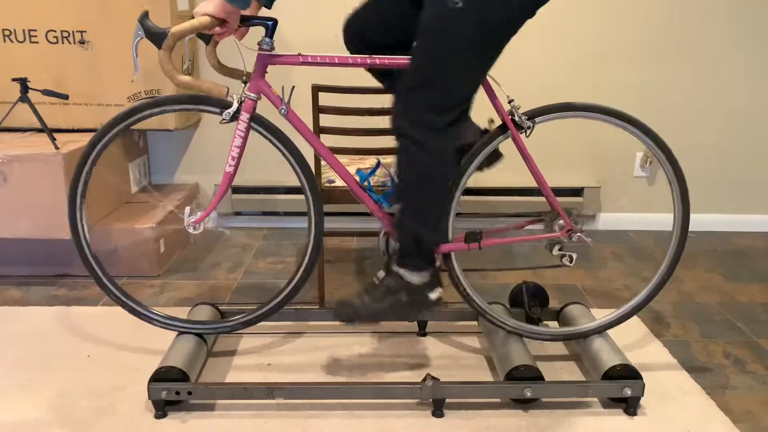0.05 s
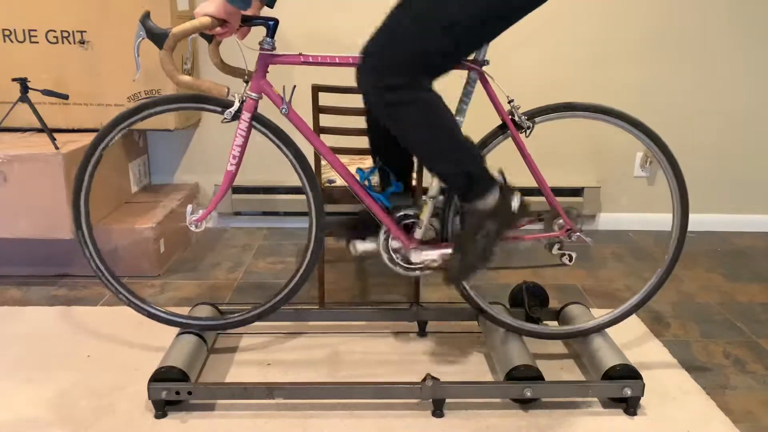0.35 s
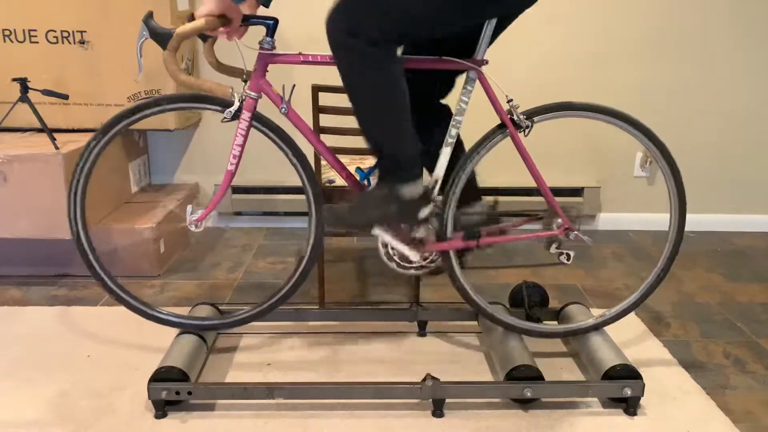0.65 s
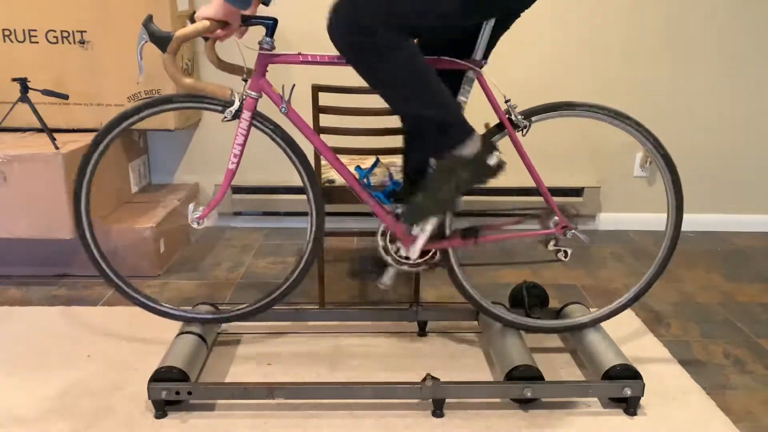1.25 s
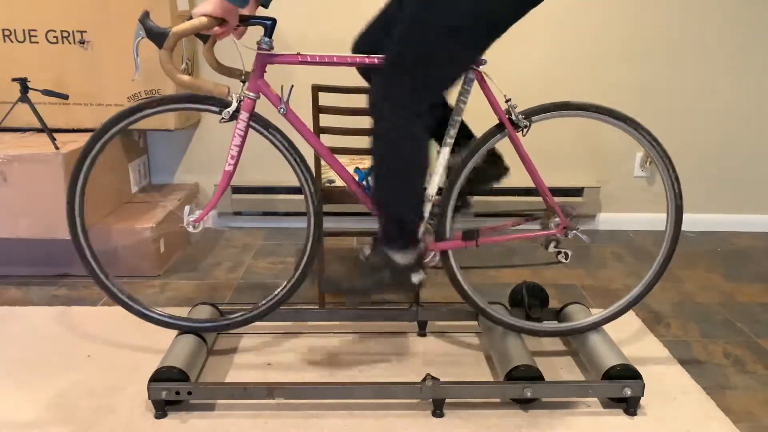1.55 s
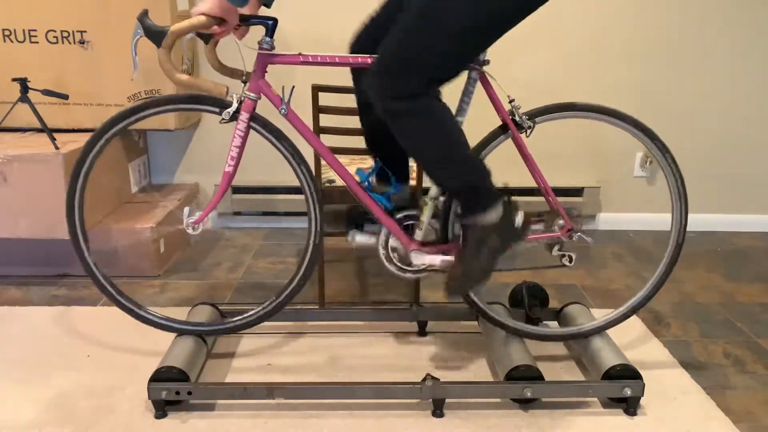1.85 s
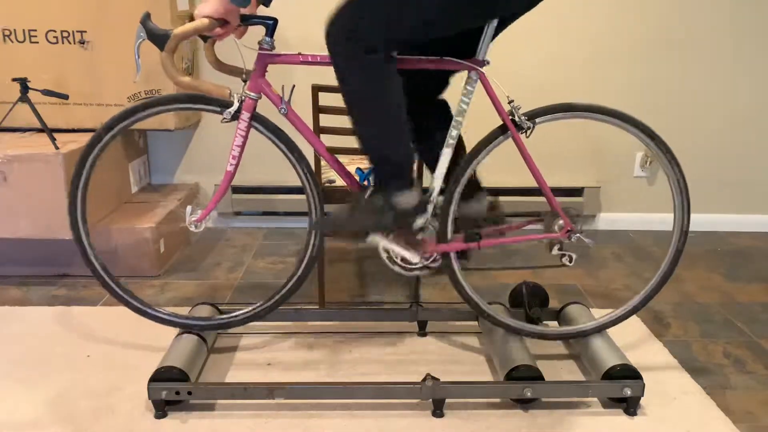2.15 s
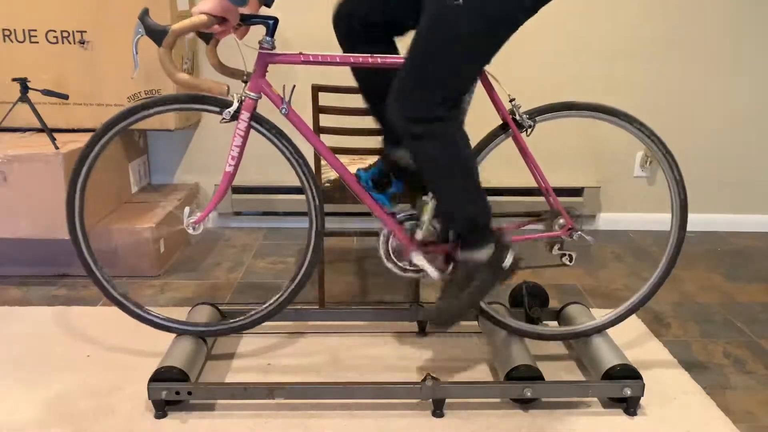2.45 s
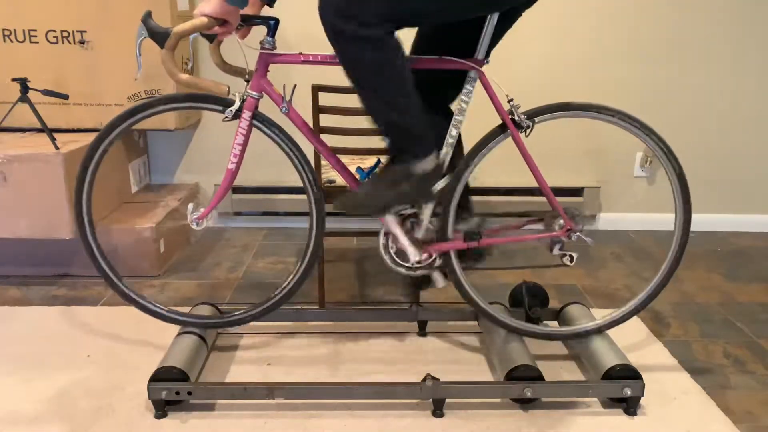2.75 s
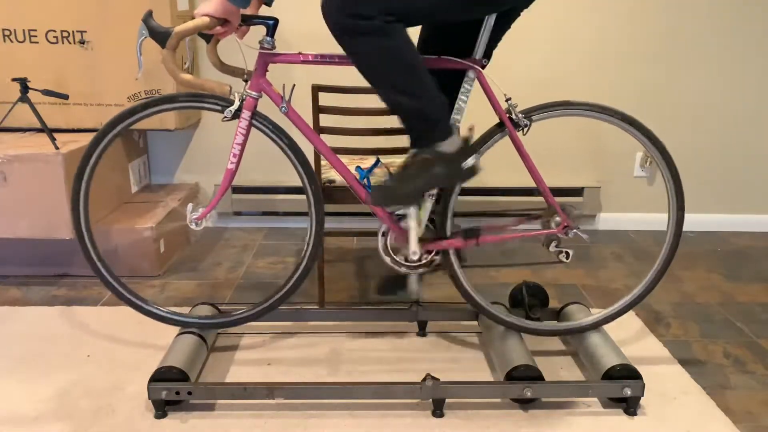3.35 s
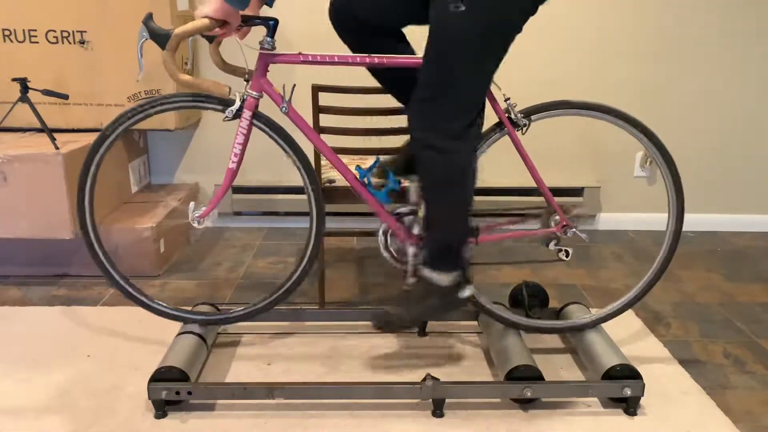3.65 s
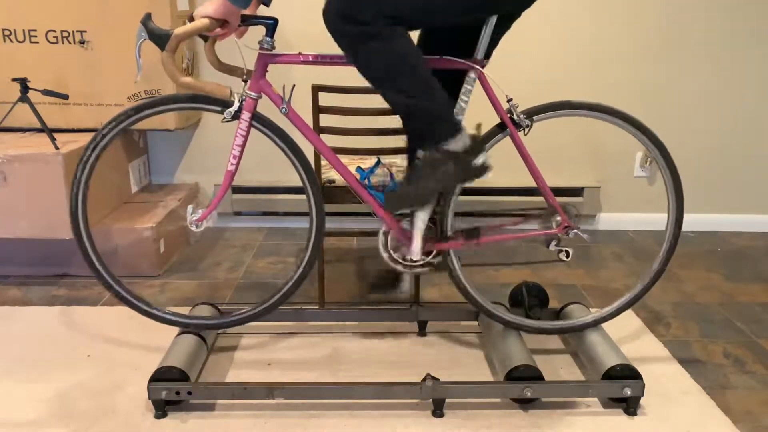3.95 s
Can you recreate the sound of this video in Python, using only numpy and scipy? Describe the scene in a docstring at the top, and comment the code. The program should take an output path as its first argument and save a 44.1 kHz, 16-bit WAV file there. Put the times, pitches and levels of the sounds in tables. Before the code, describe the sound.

Bicycle tyres rumble and whirr steadily on indoor rollers, with a lightly ticking chain.

```python
"""A room where a bicycle is pedalled on indoor rollers, slowly gathering speed.
The tyres rumble and whirr on the drums, with a throb on every drum turn and some harder knocks.
The rolling sets drums, stand and frame ringing, and now and then shakes a low drone from the floor.
The chain ticks link by link over a fine rattle and sometimes clicks harder; loose metal clatters lightly."""
import sys
import numpy as np
from scipy import signal
from scipy.fft import rfft, irfft
from scipy.io import wavfile
from scipy.ndimage import uniform_filter1d

SR = 44100
rng = np.random.default_rng(int(sys.argv[2]) if len(sys.argv) > 2 else 0)


def digitize_waveform(pressure):
    """Quantize a signal to 16-bit integers and store it at the path in sys.argv[1].

    Rows of a 2-D input are taken as channels; values are limited to [-1, 1].
    """
    field = np.atleast_2d(pressure).T
    bounded = np.clip(field, -1, 1)
    quanta = np.round(bounded * 32767).astype(np.int16)
    wavfile.write(sys.argv[1], SR, quanta)


N = 176400
TIME = np.arange(N) / SR

# The pace of the ride. Each row: time in seconds, chain links per second.
PEDAL_SPEED = [(0, 50.41), (.333, 48.78), (.667, 49.6), (1, 50.55), (1.333, 49.88), (1.667, 54.35),
               (2, 54.93), (2.333, 60.78), (2.667, 59.93), (3, 57.66), (3.333, 61.68), (3.667, 64.46),
               (4, 62.0)]
# The tyres' two faders. Each row: time in seconds, low rumble in dB, whirr in dB.
TYRE_LEVEL = [(0, -34, -38), (.5, -33, -38), (1, -33.5, -36.5), (1.2, -34, -35), (1.4, -32.5, -34.5),
              (1.6, -32, -34), (1.8, -31, -32.5), (2.2, -31.5, -33), (2.5, -31.5, -31), (2.8, -32.5, -35.5),
              (3.1, -33, -35), (3.4, -32.5, -33), (3.7, -29.5, -33.5), (4, -31.5, -34.5)]
# Tone of the rolling noise. Each row: frequency in Hz, relative level in dB.
TYRE_COLOUR = [(30, -26), (55, -14.5), (80, -17), (105, -8), (150, -5), (195, -7.5), (250, 1.5), (340, 1),
               (530, 5), (720, 3), (950, -1), (1300, -6), (1800, -12), (2600, -20), (3400, -15.5),
               (4500, -24), (7000, -24.5), (14000, -130)]
# How deep the drum throb cuts. Each row: frequency in Hz, usual depth in dB.
THROB_DEPTH = [(100, .3), (300, .6), (700, 1.1), (1500, 1.5), (4000, 1.1)]
# The bright part of each throb lands late. Each row: frequency in Hz, delay in seconds.
THROB_DELAY = [(500, 0), (1100, .005), (3500, .008)]
# The throb over the ride. Each row: time in seconds, share of the usual depth.
THROB_AMOUNT = [(0, .8), (1.25, 1.35), (1.8, 1.3), (2.3, .75), (4, .65)]
# Harder knocks of tyre on drum. Each row: time in seconds, boost in dB.
KNOCKS = [(.235, 2), (.295, 2), (.455, 2.5), (.622, 4.5), (.732, 3), (.938, 1.5), (1.055, 1.5),
          (1.159, 2.5), (1.266, 2.5), (1.578, 1), (1.642, 2), (1.736, 4.5), (1.817, 3), (1.914, 1.5),
          (1.985, 3), (2.076, 2.5), (2.399, 2.5), (2.497, 3), (3.761, 1), (3.886, 1), (3.931, 3),
          (3.974, 2.5)]
# Brief dips in the rumble. Each row: time in seconds, level change in dB.
LULLS = [(.16, -3.5), (.355, -3.5), (.597, -2.5), (.668, -1.5), (.708, -3), (.78, -2), (1.3, -3),
         (1.405, -1.5), (1.71, -0.5), (2.112, -0.5), (3.08, -0.5), (3.85, -2.5)]
# Where knocks and lulls bite. Each row: frequency in Hz, share of their depth.
LUMP_REACH = [(100, .2), (250, 1), (800, 1), (2000, .3)]
# Stereo image of the rolling. Each row: frequency in Hz, left-right correlation.
LIKENESS = [(60, 1), (150, 0.94), (280, 0.88), (550, 0.38), (1100, 0.55), (2200, 0.081), (5000, 0.023)]
# Rings of drums and stand. Each row: pitch in Hz, width in Hz, dB against the tyre level.
DRUM_RINGS = [(86, 5.3, -30.5), (157, 13.4, -23), (228, 9.1, -16), (256, 15, -13), (309.4, 15, -15.5),
              (403.1, 12.5, -11), (457.9, 14.8, -6.5), (563.4, 26, -13.5), (617.6, 8.1, -8), (719, 6.9, -9),
              (739.2, 17, -10), (870.3, 11.4, -12), (917, 8.3, -15), (957.3, 23, -12.5), (1145, 95, -41),
              (1180.5, 16, -20)]
# Rings of the bicycle's steel. Each row: pitch in Hz, width in Hz, base level in dB, left minus right in dB.
STEEL_RINGS = [(1720, 16, -59.5, 1), (1812, 14, -57, 1), (1897, 22, -62.5, 3), (2040, 60, -66, 4),
               (2420, 26, -66, 1), (3245, 11, -62.5, 0), (3385, 50, -65.5, 0), (5240, 60, -71.5, -7),
               (5420, 80, -71, -7)]
# Swell of the steel. Each row: time in seconds, gain of the low rings in dB, gain of the high rings in dB.
STEEL_SWELL = [(0, -7, -4), (.5, -3, -3), (.9, 1.5, -2), (1.4, 1, -2), (2.3, 0, 1), (2.9, 1, 3.5),
               (3.5, -1, 2.5), (4, -2.5, 1)]
# The drums' held note. Each row: time in seconds, pitch in Hz, base level in dB.
DRUM_HUM = [(0, 448.6, -42), (.5, 442.3, -46.5), (.7, 437, -58), (.82, 438, -37.5), (1, 442.7, -40),
            (1.3, 464.7, -49.5), (1.5, 467, -38.5), (1.8, 469, -41), (2.2, 448, -42.5), (2.5, 459.4, -37.5),
            (2.75, 440.4, -41), (3, 451.6, -41), (3.3, 458.6, -54), (3.6, 467.6, -41.5), (4, 464.5, -34.5)]
# The chain's fader. Each row: time in seconds, gain in dB.
CHAIN_LEVEL = [(0, -49.5), (.7, -49.5), (1.4, -50), (2.2, -47.5), (3, -47), (3.6, -46.5), (4, -45.5)]
# Rings of links and sprocket. Each row: centre in Hz, width in Hz, relative level in dB.
CHAIN_RINGS = [(4400, 5400, -6), (8400, 1200, -7.5), (9600, 500, -9.5), (10600, 450, -9),
               (11700, 1400, -7.5), (12400, 7800, -1)]
# Harder clicks of the chain. Each row: time in seconds, relative strength in dB.
CHAIN_CLICKS = [(0.192, 21), (.5776, 18), (2.1001, 13), (2.1355, 14), (2.2935, 19), (2.455, 15),
                (2.4705, 18), (2.579, 17), (2.6055, 13), (2.6868, 14), (2.7375, 16), (3.2496, 21),
                (3.431, 17), (3.4426, 24), (3.5977, 13), (3.692, 13)]
# Clatters of loose metal. Each row: start in seconds, level in dB, centre in Hz.
CLATTERS = [(0.063, -52, 3600), (.885, -52, 3400), (.99, -54, 3570), (1.0546, -47, 1770),
            (1.114, -47.5, 1747), (1.2121, -48, 1800), (1.316, -52, 3580), (1.4329, -47, 1900),
            (1.735, -48.5, 3205), (2.024, -50, 3313), (2.078, -54, 3360), (2.452, -51, 3350),
            (2.6055, -50, 2020), (3.597, -53, 3500)]
# Drones of the floor. Each row: fade-in midpoint and fade-out midpoint in seconds, pitch in Hz,
# level in dB when fully open.
FLOOR_DRONES = [(0.817, 1.074, 83, -57.5), (2.325, 2.57, 155.5, -46.5), (3.8, 2, 87, -69),
                (2.583, 2.85, 86.9, -53), (2.9, 2.81, 180, -50)]

# Turning parts. Each pair: turns per chain link, phase of the accent in turns.
DRUM, WHEEL, PEDAL_STROKE = (.369, .49), (.058, .58), (.052, .27)
RUMBLE_HZ, WHIRR_HZ, STEEL_SPLIT_HZ = 382, 895, 2800
WHEEL_SWING_DB, SHARED_FLUTTER_DB, BAND_FLUTTER_DB = .55, -.26, 1.5
TYRE_TRIM_DB, TYRE_PAN_DB, TYRE_LAG_S = -.5, .47, .00011
TICK_JITTER_S, TICK_DECAY_S, CLICK_DECAY_S, CHAIN_LAG_S = .0007, .0018, .0012, .00026
TICK_DB, TICK_SPREAD_DB, STROKE_SWING_DB = -2.5, 2.5, 1.5
RATTLE_DB, RATTLE_GRAIN_DB = 6, 2.5
CHAIN_WANDER_DB, CHAIN_ROOM_DB, CHAIN_TRIM_DB = .7, -8, -2


def tyres(links, ring_throb_db=.8):
    """Tread noise throbs with the drums, swells with the wheel and sets drums, stand and steel ringing."""
    rumble_db, whirr_db = in_time(TYRE_LEVEL)
    sway_db = WHEEL_SWING_DB * np.cos(angle(links, WHEEL)) + SHARED_FLUTTER_DB * drift(18)
    white = rng.standard_normal((2, 2, N))
    edges = 22 * 2 ** (np.arange(29) / 3)  # third octaves, in Hz
    throb, rough, lump_db = drum_throb(links), tread_grit(), knocks_and_lulls()
    rolling = 0
    for k, (low, high) in enumerate(zip(edges, edges[1:])):
        hz = np.sqrt(low * high)
        share = whirr_share(hz)
        late_throb = np.interp(TIME - at_hz(THROB_DELAY, hz), TIME, throb)
        db = rumble_db + share * (whirr_db - rumble_db) + at_hz(TYRE_COLOUR, hz)
        db += at_hz(THROB_DEPTH, hz) * late_throb + at_hz(LUMP_REACH, hz) * lump_db
        db += sway_db + BAND_FLUTTER_DB * drift(9.5)
        noise = spread(band(white[k % 2], low, high), at_hz(LIKENESS, hz))
        rolling += from_db(db) * rough ** share * noise
    out = rms_one(rolling) * from_db(TYRE_TRIM_DB + np.mean(rumble_db))
    push = rng.standard_normal((2, N)) * rough
    pulsing = from_db(ring_throb_db * throb + sway_db)
    out += drum_rings(push, rumble_db, whirr_db) * pulsing * from_db(lump_db)
    out += steel_rings(push) * pulsing
    return lag_left(out, TYRE_LAG_S) * pan(TYRE_PAN_DB)


def drum_throb(links, lead_turns=.23, rise_turns=.1, decay_turns=.45, spread_db=.8):
    """One bump per drum turn, with a fast attack and a longer tail; the curve swings around zero."""
    turns = links * DRUM[0] - DRUM[1] + lead_turns + 1
    within = turns % 1
    strength = from_db(spread_db * rng.standard_normal(int(turns[-1]) + 1))[turns.astype(int)]
    bump = strength * np.minimum(within / rise_turns, 1) * np.exp(-within / decay_turns)
    return rms_one(bump - bump.mean()) * in_time(THROB_AMOUNT)[0]


def tread_grit(per_s=260, decay_s=.005, grit_db=-9):
    """Random contacts of the tread put grain on the whirr, as a gain."""
    when, strength = rng.random((int(per_s * N / SR), 2)).T
    contacts = bursts(when * N / SR, strength, decay_s)
    return rms_one(np.sqrt(1 + from_db(grit_db) ** 2 * contacts / contacts.mean()))


def knocks_and_lulls(rise_s=.009, lull_s=.017):
    """Lumps in the rumble, in dB: knocks hit fast and die away, lulls are short and round."""
    out = np.zeros(N)
    for s, db in KNOCKS:
        age = np.maximum(TIME - s + rise_s / 2, 0) / rise_s
        out += db * age * np.exp(1 - age)
    for s, db in LULLS:
        out += db * np.exp(-((TIME - s) / lull_s) ** 2)
    return out


def drum_rings(push, rumble_db, whirr_db):
    """Drums and stand ring under the tread, riding the tyres' level."""
    out = 0
    for hz, width, db in DRUM_RINGS:
        tyre_db = rumble_db + whirr_share(hz) * (whirr_db - rumble_db)
        out += from_db(db + tyre_db) * resonate(push, hz, width)
    return even_out(waver(out))


def steel_rings(push):
    """The tread draws thin, high rings from the bicycle's steel."""
    low_db, high_db = in_time(STEEL_SWELL)
    out = 0
    for hz, width, db, pan_db in STEEL_RINGS:
        swell_db = low_db if hz < STEEL_SPLIT_HZ else high_db
        out += from_db(db + swell_db) * pan(pan_db / 2) * resonate(push, hz, width)
    return out


def drum_hum(waver_hz=7.037, flutter_db=2.5, pan_db=2):
    """The rolling sustains the drums' strongest ring, which slides a little in pitch."""
    hz, db = in_time(DRUM_HUM)
    phase = 2 * np.pi * np.cumsum(hz + waver_hz * drift(14.28)) / SR
    gain = from_db(db + knocks_and_lulls() + flutter_db * drift(16))
    return gain * np.sqrt(2) * np.sin(phase) * pan(pan_db)


def chain(links, seat_phase=.72):
    """Each link ticks as it seats, harder on the pedal stroke; ticks, clicks and rattle ring the steel."""
    seats = np.arange(int(links[-1])) + seat_phase
    jitter, accent = rng.standard_normal((len(seats), 2)).T
    tick_s = np.interp(seats, links, TIME) + TICK_JITTER_S * jitter
    stroke_db = STROKE_SWING_DB * np.cos(angle(seats, PEDAL_STROKE))
    ticks = bursts(tick_s, from_db(TICK_SPREAD_DB * np.clip(accent, -2, 2) + stroke_db), TICK_DECAY_S)
    click_s, click_db = np.transpose(CHAIN_CLICKS)
    clicks = bursts(click_s, from_db(click_db), CLICK_DECAY_S)
    rattle = from_db(RATTLE_DB) * rms_one(from_db(RATTLE_GRAIN_DB * drift(400)))
    force = np.sqrt(from_db(TICK_DB) ** 2 * ticks / ticks.mean() + clicks + rattle ** 2)
    level_db = in_time(CHAIN_LEVEL)[0] + CHAIN_TRIM_DB + CHAIN_WANDER_DB * drift(7.6)
    out = 0
    for hz, width, db in CHAIN_RINGS:
        contact = force * rng.standard_normal(N)
        room = from_db(CHAIN_ROOM_DB) * rng.standard_normal((2, N))  # a steady, wide wash
        out += from_db(db) * rms_one(band(contact + room, hz - width / 2, hz + width / 2))
    return lag_left(from_db(level_db) * out, CHAIN_LAG_S)


def metal_clatter(decay_s=.018, band_ratio=1.25, ring_db=-4):
    """Loose metal chatters for an instant and leaves the steel ringing."""
    contacts = np.zeros((2, N))
    for s, db, hz in CLATTERS:
        chatter = rms_one(band(rng.standard_normal((2, N)), hz / band_ratio, hz * band_ratio))
        envelope = np.sqrt(bursts(np.array([s]), from_db([db]), decay_s))
        contacts += spread(chatter, alike=.3) * envelope
    ringing = sum(band(contacts, hz - width, hz + width, order=1) for hz, width, _, _ in STEEL_RINGS)
    return contacts + from_db(ring_db) * ringing


def floor_drones(fade_s=.11):
    """Short low hums as the rollers shake the floor."""
    out = np.zeros(N)
    for start, end, hz, db in FLOOR_DRONES:
        swell = np.clip(np.minimum(TIME - start, end - TIME) / fade_s + .5, 0, 1)
        phase = 2 * np.pi * hz * TIME + .39 * drift(1.93)
        out += from_db(db) * swell * np.sqrt(2) * np.sin(phase)
    return out


def resonate(push, hz, width, least_alike=.067):
    """A narrow stereo resonance with steep skirts, at rms 1."""
    ring = band(push, hz - width / 2, hz + width / 2, order=1)
    ring = spread(ring, max(least_alike, at_hz(LIKENESS, hz)))
    return rms_one(band(ring, hz - 4 * width, hz + 4 * width, order=1))


def waver(x, depth=.003, rate_hz=5):
    """Let the pitch wander a little."""
    moved = TIME + np.cumsum(depth * drift(rate_hz)) / SR
    return np.array([np.interp(moved, TIME, side) for side in x])


def even_out(x, amount=.6):
    """Ride the gain so the rings trade strength while their sum stays nearly even."""
    power = np.mean(x, axis=0) ** 2
    short, long = (uniform_filter1d(uniform_filter1d(power, size), size) + 1e-12
                   for size in (SR // 30, SR // 3))
    return x * (long / short) ** (amount / 2)


def bursts(times, gains, decay_s):
    """Power envelope of short contacts that die away."""
    hits = np.zeros(N)
    np.add.at(hits, np.clip((times * SR).astype(int), 0, N - 1), gains ** 2)
    return signal.lfilter([1], [1, -np.exp(-2 / (decay_s * SR))], hits + 1e-18)


def whirr_share(hz):
    """Crossfade from 0 in the low rumble to 1 in the whirr."""
    return at_hz([(RUMBLE_HZ, 0), (WHIRR_HZ, 1)], hz)


def angle(links, part):
    """Angle of a turning part, zero at its loudest moment."""
    return 2 * np.pi * (links * part[0] - part[1])


def drift(rate_hz):
    """Smooth random movement, about rms 1."""
    pole = np.exp(-40 * np.pi * rate_hz / SR)  # runs at a twentieth of the sample rate
    noise = rng.standard_normal(N // 20 + 2002)
    slow = signal.lfilter([1], [1, -2 * pole, pole * pole], noise)[2000:]
    return np.interp(np.arange(N) / 20, np.arange(len(slow)), rms_one(slow))


def band(x, low, high, order=2):
    """Butterworth band-pass."""
    edges = [max(low, 10), min(high, .48 * SR)]
    return signal.sosfilt(signal.butter(order, edges, "band", fs=SR, output="sos"), x)


def spread(pair, alike):
    """Mix two unrelated sounds as mid and side for a given left-right likeness."""
    alike = np.clip(alike, 0, 1)
    return np.sqrt(1 + alike) * pair[0] + np.sqrt(1 - alike) * pair[1] * np.array([[1], [-1]])


def pan(db):
    """Gains that lift the left and lower the right, each by db."""
    return from_db([[db], [-db]])


def lag_left(x, seconds):
    """The sound reaches the left microphone later."""
    hz = np.arange(N // 2 + 1) * SR / N
    return np.array([irfft(rfft(x[0]) * np.exp(-2j * np.pi * hz * seconds), N), x[1]])


def in_time(rows):
    """Each column of an automation curve at every sample."""
    s, *columns = np.transpose(rows)
    return [np.interp(TIME, s, c) for c in columns]


def at_hz(points, hz):
    """Read a curve on a log-frequency axis."""
    freqs, values = np.transpose(points)
    return np.interp(np.log(hz), np.log(freqs), values)


def from_db(db):
    """Decibels to gain."""
    return 10 ** (np.asarray(db) / 20)


def rms_one(x):
    """Scale to rms 1."""
    return x / np.sqrt(np.mean(x ** 2) + 1e-20)


def scene():
    """The mix: one pedalling speed drives chain, wheels and drums."""
    links = np.cumsum(in_time(PEDAL_SPEED)[0]) / SR  # chain links gone by
    return tyres(links) + drum_hum() + floor_drones() + chain(links) + metal_clatter()


def record(dry, cutoff_hz=15900):
    """A steep low-pass takes off the very top."""
    return signal.sosfilt(signal.ellip(12, .1, 90, cutoff_hz, fs=SR, output="sos"), dry)


dry = scene()
out = record(dry)
digitize_waveform(out)
```